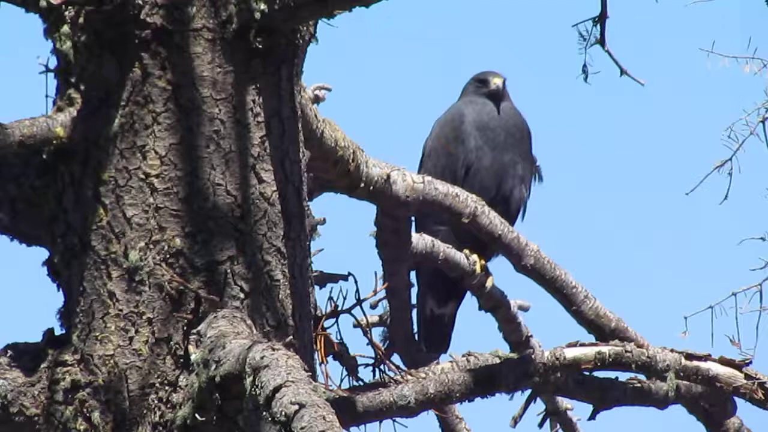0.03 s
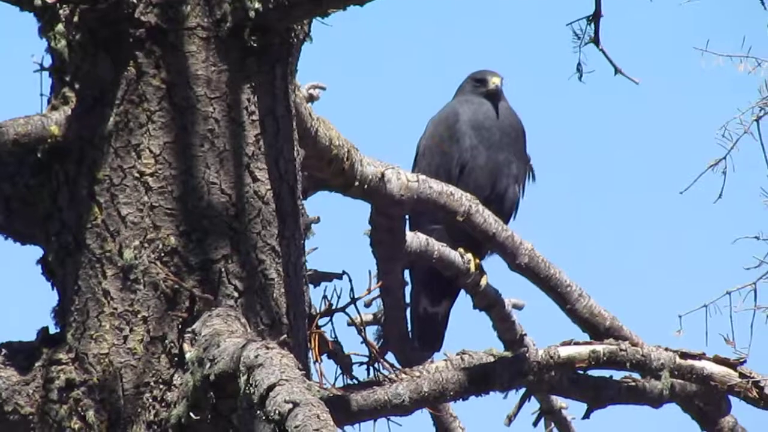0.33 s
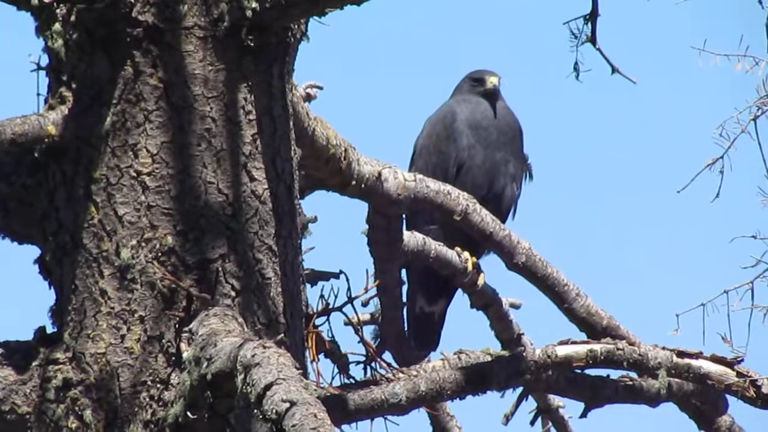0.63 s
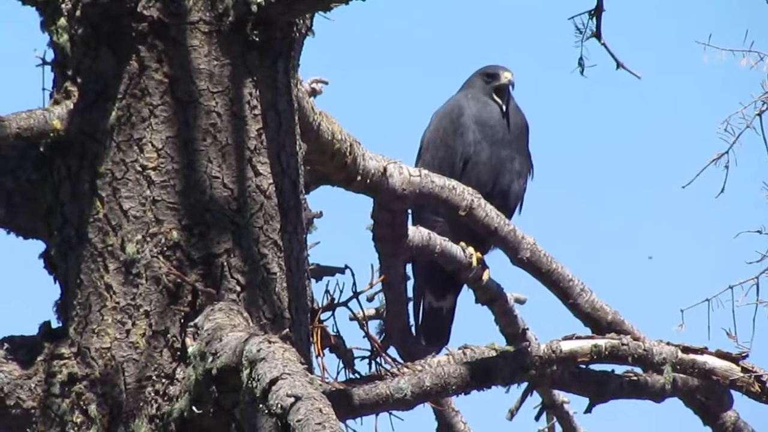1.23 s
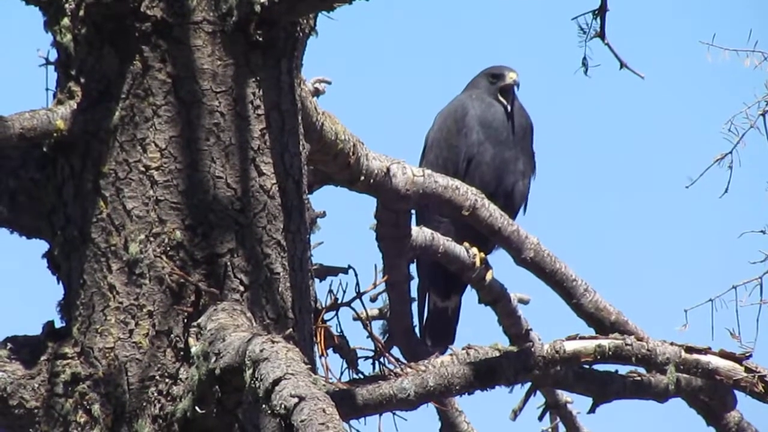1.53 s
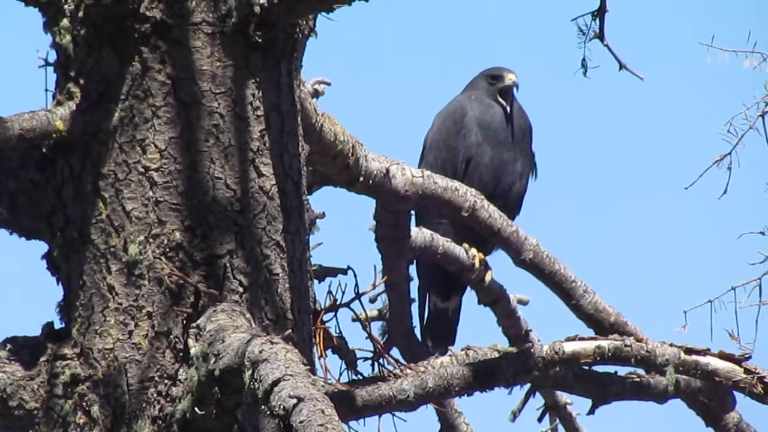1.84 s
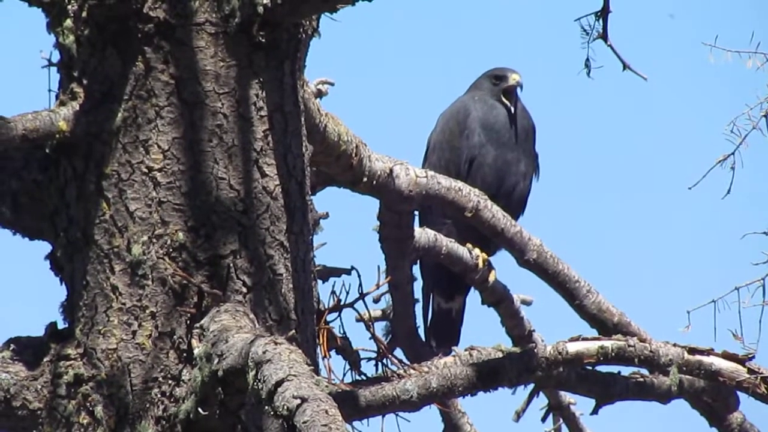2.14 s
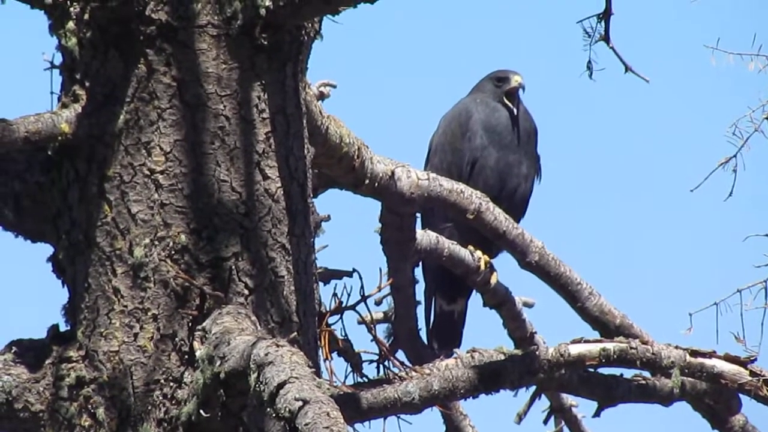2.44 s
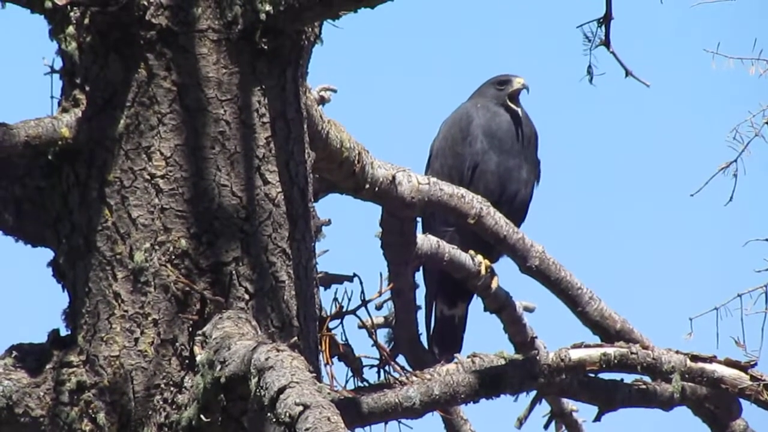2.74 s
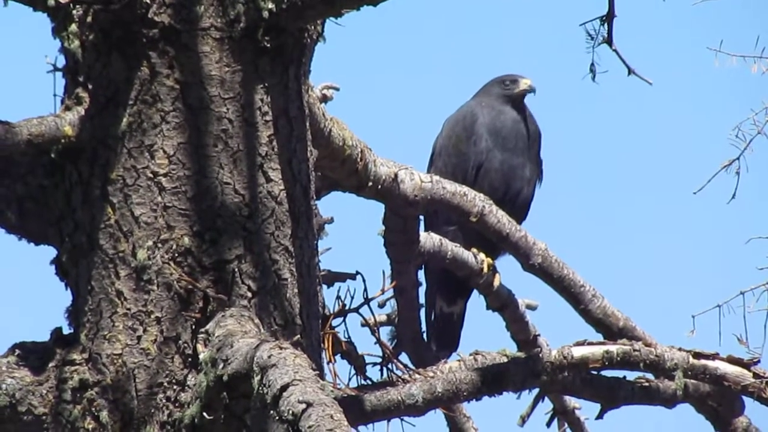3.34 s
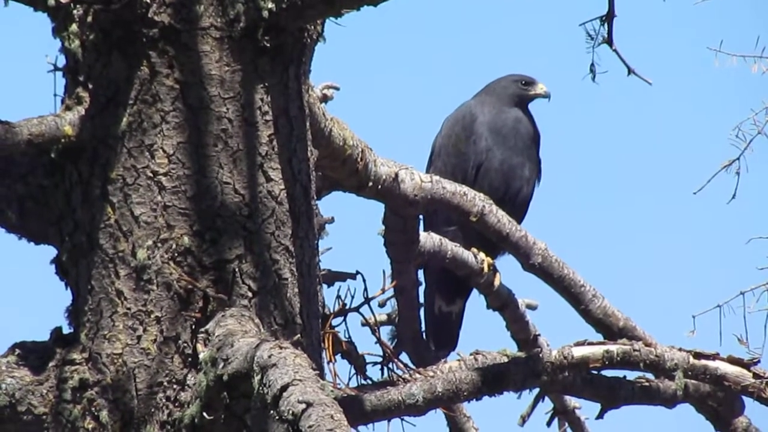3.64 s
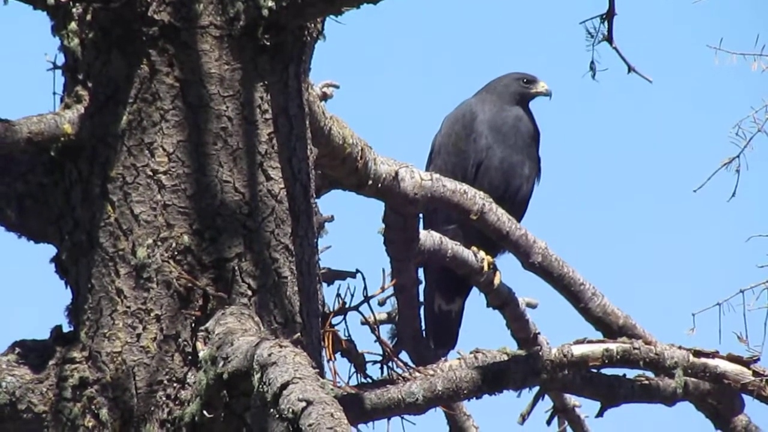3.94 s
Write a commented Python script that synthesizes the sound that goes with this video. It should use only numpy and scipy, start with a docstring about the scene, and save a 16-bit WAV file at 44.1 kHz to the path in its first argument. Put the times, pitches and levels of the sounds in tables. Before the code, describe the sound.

One long hawk scream rises and slowly sinks, with soft wind and a few handling ticks.

```python
"""Wind rushes steadily in the trees, and a small bird twitters three times far off. After a second, a hawk
on a pine branch gives one long mewing scream that rises and slowly sinks. Its second harmonic (twice the
base pitch) carries the call, which is hoarse with half-harmonics until the beak is wide open. A hand-held
camera ticks here and there and thumps in mid-scream. Near three seconds the scream ends and echoes faintly
in the trees; a short peep, a few more ticks and soft finger rustles follow."""
import sys
import numpy as np
from scipy import signal
from scipy.io import wavfile
from scipy.ndimage import uniform_filter1d

SR = 44100
rng = np.random.default_rng(int(sys.argv[2]) if len(sys.argv) > 2 else 0)


def wav_record(signal):
    """Record a signal, one row per channel, as 16-bit PCM in the file named by sys.argv[1]."""
    frames = np.transpose(np.atleast_2d(signal))
    bounded = np.clip(frames, -1, 1)
    # unit amplitude maps onto the largest positive 16-bit level
    quanta = np.round(bounded * 32767).astype(np.int16)
    wavfile.write(sys.argv[1], SR, quanta)


N = 176400
T = np.arange(N) / SR

# The scream's base pitch. Each row: time in seconds, pitch in Hz.
SCREAM_PITCH = [(1.048, 1183), (1.075, 1290), (1.13, 1389), (1.19, 1460), (1.24, 1499), (1.33, 1504),
                (1.39, 1493), (1.5, 1500), (1.62, 1457), (1.72, 1460), (1.79, 1447), (1.87, 1462),
                (2.02, 1463), (2.15, 1436), (2.22, 1433), (2.36, 1416), (2.55, 1403), (2.68, 1369),
                (2.79, 1317), (2.84, 1225), (2.875, 1098)]
# The second harmonic, the main tone. Each row: time in seconds, relative level in dB.
MAIN_TONE_LEVEL = [(1.06, -41), (1.15, -36), (1.3, -40), (1.42, -41), (1.46, -46.5), (1.52, -41),
                   (1.65, -37.5), (1.8, -36.5), (1.92, -38), (2.1, -36.5), (2.23, -39.5), (2.33, -36),
                   (2.5, -37), (2.64, -34.5), (2.72, -38.5), (2.8, -40.5), (2.85, -49.5), (2.88, -35)]
# How hard the hawk pushes. Each row: time in seconds, effort in dB.
EFFORT_CURVE = [(1.06, -60), (1.12, -66), (1.16, -56), (1.24, -53.5), (1.31, -50.5), (1.5, -46), (1.6, -42),
                (1.8, -42), (2.0, -43.5), (2.11, -46), (2.2, -44), (2.42, -44.5), (2.58, -49), (2.72, -56),
                (2.8, -61.5), (2.87, -84)]
# The other harmonics. Each row: multiple of the pitch, level in dB at full effort, dB gained per dB of
# effort, left minus right in dB, how far the left side leads in radians, flutter in dB.
HARMONICS = [(1, -50, 0.26, -1.5, 0.6, 2.5), (3, -48, 0.44, 0, 1.1, 1.94),
             (4, -46.5, 1.2, 2.5, -0.68, -0.6), (5, -49, 1.02, -2.2, 0.42, -1.3),
             (6, -63.5, .55, 5, 0.25, 1.4), (7, -69, 2.3, 2, 1.2, 1.5), (8, -68.5, 3, -3.5, .5, 0),
             (9, -80, 1.7, 0, .3, -1)]
# How much every other cycle differs, which sounds hoarse. Each row: time in seconds, depth in dB.
HOARSENESS = [(1.13, -30), (1.2, -7), (1.38, -3), (1.52, -2), (1.58, -22), (1.9, -22), (2.3, -26),
              (2.7, -26)]
# Tones between the harmonics. Each row: multiple of the pitch, level in dB at full hoarseness,
# level in dB of a noisy trace at full effort.
HALF_HARMONICS = [(1.5, -53.5, -72), (2.5, -52, -68.5), (3.5, -63, -75), (4.5, -50, -71.5),
                  (5.5, -70, -70.5), (6.5, -72, -79), (7.5, -72, -78.5)]
# The scream's airy hiss. Each row: frequency in Hz, relative level in dB.
HISS_SPECTRUM = [(1500, -13), (3200, -9), (5000, 3), (6500, 0), (8000, -7), (12000, -17), (15000, -32)]
# The sound shifts sideways as the head turns. Each row: time in seconds, left minus right in dB.
HEAD_TURN = [(1.08, -1.8), (1.25, 2.5), (1.42, 4), (1.65, .3), (2.1, -.8), (2.8, -1.2)]


def hawk():
    """One vibration makes the scream: effort brightens it, and uneven cycles add half-harmonics."""
    start_s, end_s, attack_s, release_s = 1.041, 2.885, .016, .05
    beak_hz, beak_width_hz, beak_peak_db = 11840, 340, 7  # the open beak's narrow resonance
    full_effort_db, flutter_hz = -44, 24
    main_place = dict(pan_db=-0.8, lead_rad=0.41)
    jitter = 1 + 0.0013 * drift(97)
    pitch_hz = uniform_filter1d(in_time(SCREAM_PITCH), size=800) * jitter
    phase = 2 * np.pi * np.cumsum(pitch_hz) / SR
    effort_db = in_time(EFFORT_CURVE) - full_effort_db
    hoarse_db = in_time(HOARSENESS)
    voice = voice_tone(2 * phase, in_time(MAIN_TONE_LEVEL) + 2, **main_place)
    for multiple, db, share, pan_db, lead_rad, flutter_db in HARMONICS:
        beak_db = beak_peak_db / (1 + ((multiple * pitch_hz - beak_hz) / beak_width_hz) ** 2)
        level_db = db + share * effort_db + beak_db + flutter_db * drift(flutter_hz)
        voice += voice_tone(multiple * phase, level_db, pan_db, lead_rad)
    for multiple, db, trace_db in HALF_HARMONICS:
        voice += voice_tone(multiple * phase, db + hoarse_db, **main_place)
        noisy_trace = drift(105) * np.sqrt(2) * np.sin(multiple * phase)
        voice += from_db(trace_db + 0.44 * effort_db) * noisy_trace
    voice += from_db(-61 + .35 * effort_db) * banded_noise(HISS_SPECTRUM, flicker_db=1)
    fade_in = np.clip((T - start_s) / attack_s, 0, 1)
    fade_out = np.clip((end_s - T) / release_s, 0, 1)
    shimmer = from_db(0.66 * drift(flutter_hz))
    return voice * fade_in * fade_out * shimmer * pan(in_time(HEAD_TURN))


def voice_tone(phase, db, pan_db, lead_rad, rasp_db=-29, rasp_width_hz=210):
    """One tone of the scream with a faint rasp around it; the air makes it waver from side to side."""
    angle = phase + np.array([[.5], [-.5]]) * lead_rad
    rasp = drift(rasp_width_hz) * np.cos(angle) + drift(rasp_width_hz) * np.sin(angle)
    sides = pan(pan_db + .7 * drift(9))
    return np.sqrt(2) * from_db(db) * sides * (np.sin(angle) + from_db(rasp_db) * rasp)


# The peep after the scream: start in seconds, length in seconds, first and last pitch in Hz, level in dB.
LAST_PEEP = (3.097, .046, 2470, 2382, -48.5)


def peep():
    """One short whistle that sinks a little."""
    return whistle(*LAST_PEEP)


def tree_echo(calls, level_db=-19.5, fade_60_db_s=1.3, build_s=.05, cutoff_hz=3200):
    """The trees scatter the calls back as a faint, dull tail."""
    age = T[:SR]
    echo = rng.standard_normal((2, SR)) * from_db(-60 * age / fade_60_db_s)
    echo *= 1 - np.exp(-age / build_s)
    echo *= from_db(level_db) / np.sqrt(np.sum(echo ** 2) / 2)
    dull = signal.sosfilt(signal.butter(2, cutoff_hz, fs=SR, output="sos"), calls)
    return signal.fftconvolve(dull, echo, axes=1)[:, :N]


# Sharp ticks. Each row: start in seconds, then relative levels in dB of the knock, snap and fizz.
TICK_HITS = [(0.1725, -55, -51, -33.5), (1.1737, -50, -27, -29), (1.3782, -16, -18, -40),
             (1.4169, -27, -15.5, -43), (1.4439, -10, -20, -31), (1.45, -33, -28, -29),
             (1.4676, -14, -19, -33), (1.665, -20.5, -31, -37), (2.1733, -50, -39, -31.5),
             (2.391, -35, -26, -38), (2.912, -42, -29.5, -45), (3.1009, -20, -23.5, -34),
             (3.128, -50, -35, -31.5), (3.1621, -50, -27, -29)]
# How the casing rings: low knock, middle snap, high fizz.
# Each row: lowest and highest frequency in Hz, decay time in seconds, gain in dB.
CASING_RANGES = [(298, 1300, 0.0022, -17.5), (2170, 4050, 0.0014, -13.5), (6500, 12200, 0.0015, -17.5)]


def casing_ticks(width_db=-8):
    """Handling makes the camera's casing ring with short bursts of noise in three ranges."""
    out = np.zeros((2, N))
    for k, (low_hz, high_hz, decay_s, db) in enumerate(CASING_RANGES):
        bursts = np.zeros(N)
        for start_s, *levels_db in TICK_HITS:
            decay = np.exp(-np.minimum(abs(T - start_s) / decay_s, 20))
            bursts += from_db(levels_db[k] + db) * (T >= start_s) * decay
        middle, side = rng.standard_normal((2, N))
        noise = middle + from_db(width_db) * side * [[1], [-1]]
        make_up = np.sqrt(SR / 2 / (high_hz - low_hz))  # restores the power the filter takes away
        out += band(bursts * noise, low_hz, high_hz) * make_up
    return out


# Dull thumps. Each row: start in seconds, pitch in Hz, decay time in seconds, starting level in dB.
HAND_BUMPS = [(1.445, 380, .005, -38), (1.4665, 520, .004, -34), (1.661, 250, .006, -37)]


def hand_thumps():
    """The hand bumps the camera's body, which rings with one low note that dies quickly."""
    out = np.zeros(N)
    for start_s, hz, decay_s, db in HAND_BUMPS:
        age = np.maximum(T - start_s, 0)
        out += from_db(db) * np.sin(2 * np.pi * hz * age) * np.exp(-np.minimum(age / decay_s, 20))
    return out


# Finger rubs. Each row: loudest moment in seconds, fade time to either side in seconds, level in dB.
FINGER_RUBS = [(0.173, .007, -52), (3.176, 0.0046, -47.5), (3.32, 0.019, -59), (3.416, 0.054, -60.5),
               (3.84, 0.013, -56.5)]
# The tone of a rub. Each row: frequency in Hz, relative level in dB.
RUB_SPECTRUM = [(1000, -30), (3500, -12), (5200, 4), (7000, -12), (10500, -3), (15000, -23)]


def finger_rustles():
    """Rubbing fingers make brief, soft swells of bright noise."""
    swells = sum(from_db(db) * np.exp(-np.minimum(((T - peak_s) / fade_s) ** 2, 20))
                 for peak_s, fade_s, db in FINGER_RUBS)
    return swells * banded_noise(RUB_SPECTRUM, flicker_db=2.5)


# The tone of the wind. Each row: frequency in Hz, relative level in dB.
WIND_SPECTRUM = [(20, -17), (45, -12), (80, -6.5), (130, -6), (200, -4), (350, -6.5), (600, -4.5),
                 (1150, -0.5), (1550, -2.5), (2100, -8), (3100, -13.5), (5200, -27), (8000, -28),
                 (12200, -32), (14500, -38), (16000, -43.5)]
# The swell of the low wind. Each row: time in seconds, gain in dB.
WIND_SWELL = [(.1, -0.65), (.9, -.5), (1.4, 0.12), (2.0, 1.5), (2.7, 1.8), (3.2, 0.78), (3.9, 0)]


def wind(level_db=-43.5, swell_below_hz=390):
    """Wind in the trees makes a steady rush whose low part swells gently."""
    rush = from_db(level_db) * banded_noise(WIND_SPECTRUM, flicker_db=0.59) * pan(-0.74)
    low = signal.sosfilt(signal.butter(1, swell_below_hz, fs=SR, output="sos"), rush)
    return rush + low * (from_db(in_time(WIND_SWELL)) - 1)


# The small bird's phrases. Each row: time in seconds, level in dB.
SONG_PHRASES = [(.39, -63.5), (0.662, -57), (0.934, -57.5)]
# The glides in a phrase. Each row: start in seconds from the phrase's time, length in seconds,
# first and last pitch in Hz, dB added to the phrase's level.
PHRASE_GLIDES = [(-.065, 0.057, 2450, 3100, -0.5), (-.028, 0.0336, 3000, 3780, -4),
                 (-.002, 0.0284, 3750, 2780, 3.5), (0.062, 0.025, 3650, 5020, -2),
                 (0.089, 0.035, 3800, 5000, -2), (.112, 0.028, 3900, 5000, -7)]


def songbird(echo_decay_s=.03, echo_db=-3):
    """A far bird repeats an up-and-down note and three quick rising ones, blurred by the trees."""
    song = sum(whistle(phrase_s + offset_s, length_s, from_hz, to_hz, phrase_db + db)
               for phrase_s, phrase_db in SONG_PHRASES
               for offset_s, length_s, from_hz, to_hz, db in PHRASE_GLIDES)
    echo = rng.standard_normal((2, SR // 4)) * np.exp(-T[:SR // 4] / echo_decay_s)
    echo /= np.sqrt(np.sum(echo ** 2) / 2)
    return song + from_db(echo_db) * signal.fftconvolve(song[None], echo, axes=1)[:, :N]


def whistle(start_s, length_s, from_hz, to_hz, db):
    """A pure tone that glides in pitch while it swells and fades."""
    progress = np.linspace(0, 1, int(length_s * SR))
    phase = 2 * np.pi * np.cumsum(from_hz + (to_hz - from_hz) * progress) / SR
    out, first = np.zeros(N), int(start_s * SR)
    out[first:first + len(progress)] = np.sin(np.pi * progress) * np.sin(phase)
    return np.sqrt(2) * from_db(db) * out


# How alike the noise is left and right. Each row: frequency in Hz, likeness (1 same, 0 unrelated).
STEREO_LIKENESS = [(60, 0.89), (130, 0.88), (290, 0.91), (640, 0.78), (1410, 0.52), (3100, 0.0084),
                   (6820, -0.12), (15000, -0.11)]


def banded_noise(spectrum, flicker_db):
    """Stereo noise of power 1, built from narrow bands that each flicker on their own."""
    out, edges_hz = 0, np.geomspace(22, 17000, 25)
    white = rng.standard_normal((2, 2, N))
    for k, (low_hz, high_hz) in enumerate(zip(edges_hz, edges_hz[1:])):
        middle, side = band(white[k % 2], low_hz, high_hz)  # neighbouring bands use separate noise
        centre_hz = np.sqrt(low_hz * high_hz)
        alike = at_hz(STEREO_LIKENESS, centre_hz)
        gain = from_db(at_hz(spectrum, centre_hz) + flicker_db * drift(5.7))
        out += gain * (np.sqrt(1 + alike) * middle + np.sqrt(1 - alike) * side * [[1], [-1]])
    return unit_power(out)


def drift(rate_hz):
    """A smooth random wobble of typical size 1; a higher rate wobbles faster."""
    pole = np.exp(-20 * np.pi * rate_hz / SR)  # for one step every ten samples
    steps = rng.standard_normal(N // 10 + 6002)
    slow = signal.lfilter([1], [1, -2 * pole, pole * pole], steps)[6000:]
    return np.interp(np.arange(N) / 10, np.arange(len(slow)), unit_power(slow))


def band(x, low_hz, high_hz):
    """Keep the sound between two frequencies."""
    return signal.sosfilt(signal.butter(2, [low_hz, high_hz], "band", fs=SR, output="sos"), x)


def from_db(db):
    """Turn decibels into a gain."""
    return 10 ** (np.asarray(db) / 20)


def unit_power(x):
    """Scale to an average power of 1."""
    return x / np.sqrt(np.mean(x ** 2) + 1e-20)


def in_time(rows):
    """Join (time, value) rows with straight lines."""
    return np.interp(T, *np.transpose(rows))


def at_hz(rows, hz):
    """Read between (frequency, value) rows, with octaves evenly spaced."""
    frequencies, values = np.transpose(rows)
    return np.interp(np.log(hz), np.log(frequencies), values)


def pan(db):
    """Left and right gains; positive dB leans left."""
    return from_db(np.array([[.5], [-.5]]) * db)


def scene():
    """The scream, the peep and their echo over wind, twitter and handling sounds."""
    calls = hawk() + peep()
    return calls + tree_echo(calls) + wind() + songbird() + casing_ticks() + finger_rustles() + hand_thumps()


def record(dry, start_s=.072, stop_hz=16200):
    """Keep the first instant silent and cut the highest treble."""
    treble_cut = signal.cheby2(20, 70, stop_hz, fs=SR, output="sos")
    return signal.sosfilt(treble_cut, dry * (T >= start_s))


dry = scene()
out = record(dry)
wav_record(out)
```